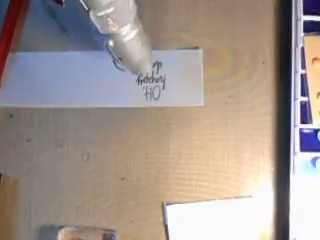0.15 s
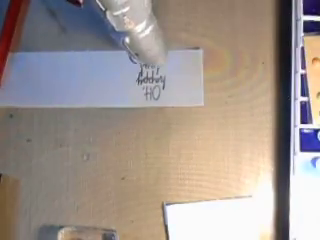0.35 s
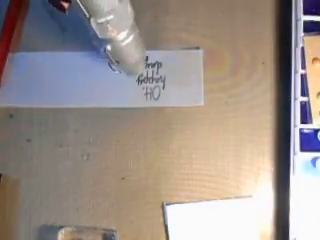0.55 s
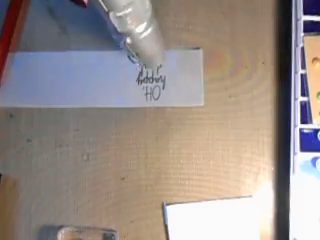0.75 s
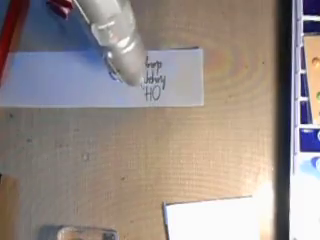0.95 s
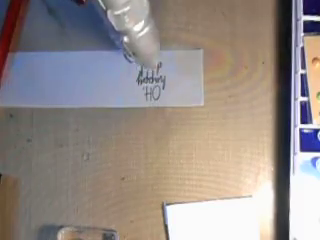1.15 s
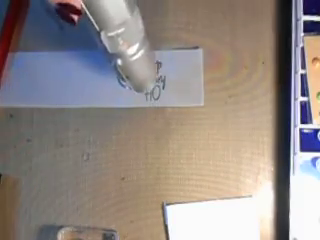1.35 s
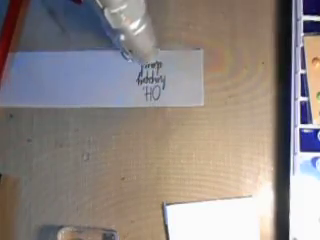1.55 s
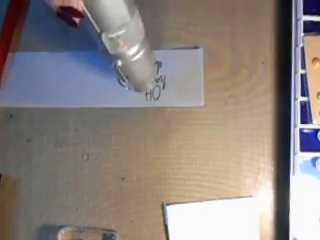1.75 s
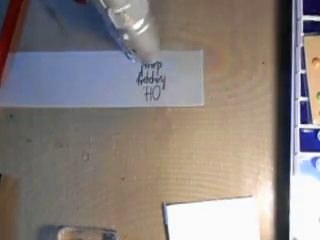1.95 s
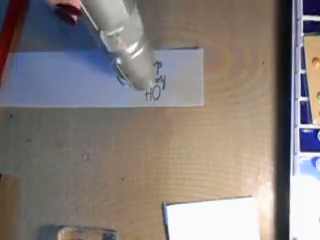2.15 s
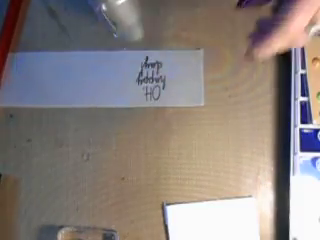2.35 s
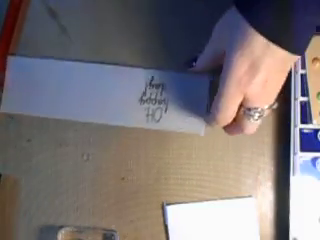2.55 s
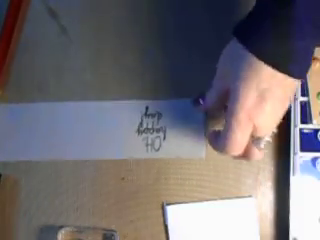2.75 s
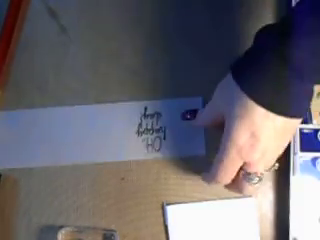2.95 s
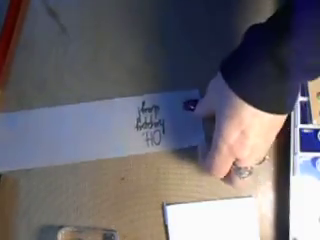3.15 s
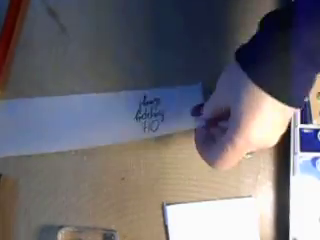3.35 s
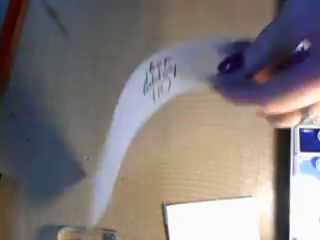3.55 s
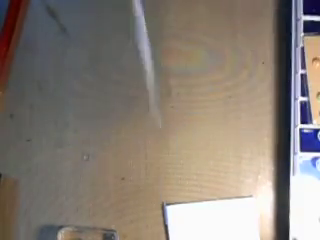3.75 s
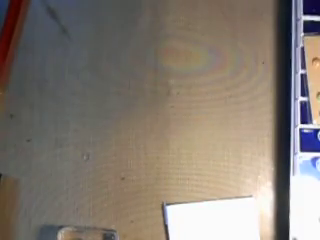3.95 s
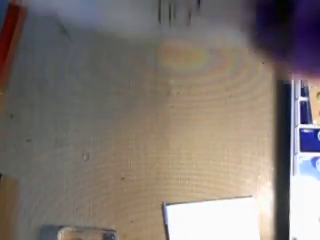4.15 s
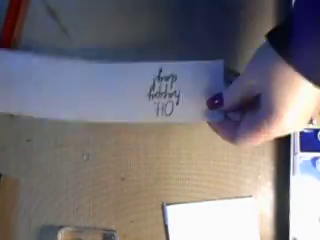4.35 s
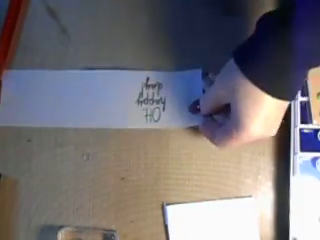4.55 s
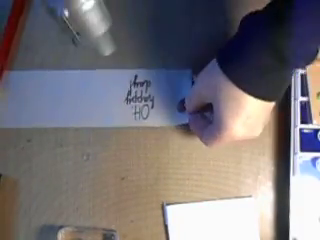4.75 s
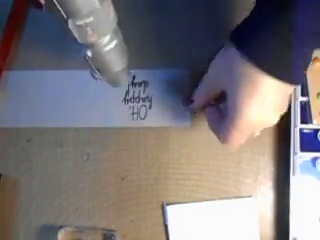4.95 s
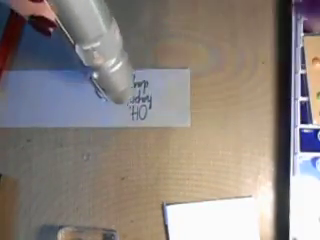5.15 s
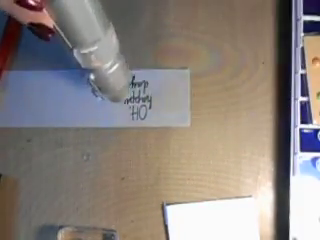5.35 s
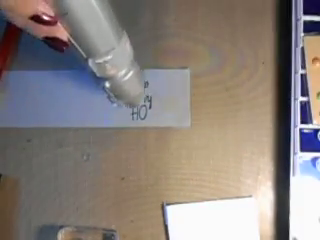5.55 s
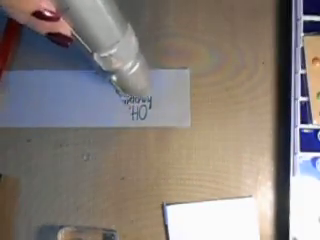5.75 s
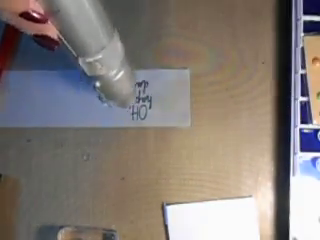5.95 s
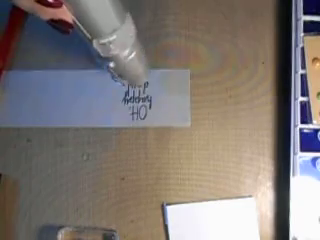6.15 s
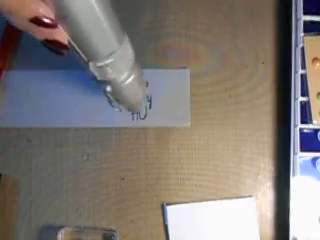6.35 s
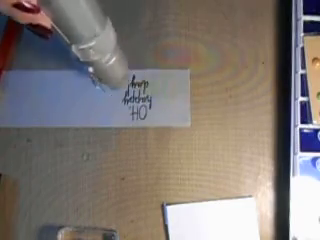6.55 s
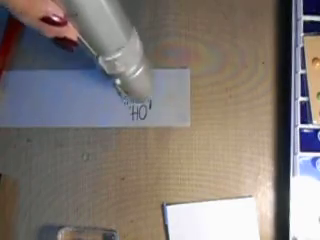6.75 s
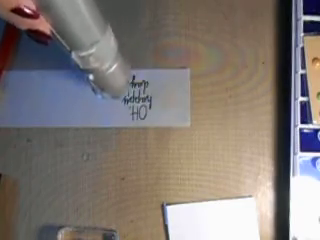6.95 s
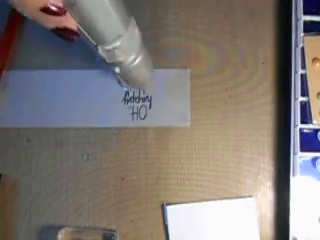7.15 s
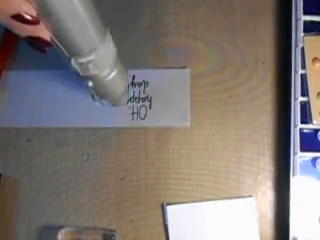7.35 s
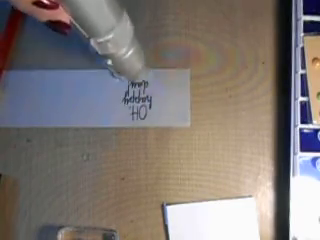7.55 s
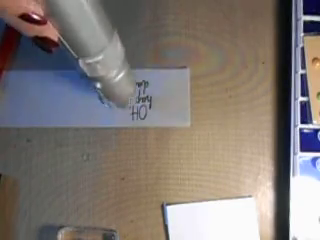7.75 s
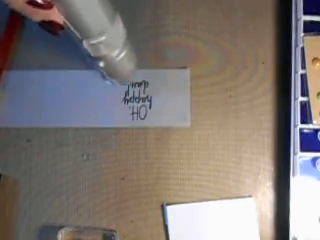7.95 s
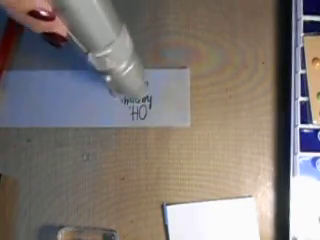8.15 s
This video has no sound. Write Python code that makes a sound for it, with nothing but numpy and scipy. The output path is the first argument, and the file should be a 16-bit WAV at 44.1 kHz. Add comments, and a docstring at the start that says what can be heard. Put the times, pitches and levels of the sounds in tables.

```python
"""A handheld heat tool is waved over a paper strip on a craft table: its fan whines as a series of shaft orders
and shaped noise hisses from the nozzle. The tool is then held aside while the strip rubs, snaps, squeaks off
the table and flaps past the microphone, whose input clips on the puff of air. The strip skids back over the
wood with a few small taps, and the waving resumes. A limiter ducks the whine after each loud moment."""
import sys
import numpy as np
from scipy import signal
from scipy.fft import rfft, irfft, next_fast_len
from scipy.io import wavfile
from scipy.ndimage import minimum_filter1d

SR = 44100
rng = np.random.default_rng(int(sys.argv[2]) if len(sys.argv) > 2 else 0)


def wrap_up_sound(samples):
    """Save the sound to the file named by the first command line argument, as 16-bit audio."""
    columns = np.atleast_2d(samples).T
    # keep every value between -1 and 1, then stretch to whole-number steps
    tamed = np.clip(columns, -1, 1)
    steps = np.round(tamed * 32767).astype(np.int16)
    wavfile.write(sys.argv[1], SR, steps)


N = 362061
TIME = np.arange(N) / SR  # s


# How the tool is held: time_s, grip (0 first, 1 held aside, 2 second; fractions blend neighbours)
GRIP_PATH = [(0, 0), (2.3, 0), (2.7, 1.07), (4.3, 1.21), (4.62, 1.8), (5.3, 2), (8.21, 2.02)]
# Nearness of the tool to the microphone: time_s, gain_db
NEARNESS = [(0, .2), (2.2, 0), (2.55, -1), (3, .5), (4.6, .8), (5.05, -1), (5.6, -0.9), (8.21, -0.4)]


def heat_tool():
    """Directivity and distance: the grip and waving hand shape whine and air, and nearness scales both."""
    grip_numbers = np.arange(3)[:, None]
    grip_shares = np.maximum(0, 1 - np.abs(curve(GRIP_PATH) - grip_numbers))
    sway = waving()
    source = whine(grip_shares, sway) + air(sway)
    return amp(curve(NEARNESS)) * source


# Fan speed: time_s, turns_hz
FAN_SPEED = [(0.0, 228.2), (0.73, 229.4), (0.8, 228.2), (1.39, 228.6), (1.55, 227.6), (1.76, 228.7),
             (2.17, 228.6), (2.4, 227.6), (2.58, 228.6), (4.37, 229.9), (4.66, 228.0), (4.92, 229.5),
             (6.54, 229.1), (6.61, 229.5), (8.14, 228.9), (8.21, 228.4)]
# The tool turns out of its beams when swung aside and back: centre_s, half_length_s, turn (units of sway)
BEAM_TURNS = [(2.63, .05, -1.8), (3.85, .4, -.8), (4.6, .2, -1.2), (5.02, .17, -.9)]


def whine(grip_shares, sway, side_db=-47, side_follow=0.5, flutter_db=1.4, beam_bend=.25,
          rattle_hz=4900, rattle_width_hz=500, rattle_db=5):
    """Harmonic series: fan shaft orders, with side tones as rectified mains shakes the motor at 120 Hz."""
    mains_phase = 2 * np.pi * 120 * TIME
    shaft_phase = 2 * np.pi * np.cumsum(curve(FAN_SPEED)) / SR
    shaft_phase += .006 * wobble(45)  # slight unsteadiness, in radians
    angle = sway.copy()
    for centre_s, half_length_s, turn in BEAM_TURNS:
        angle += turn * np.exp(-((TIME - centre_s) / half_length_s) ** 2)
    # a tone fades faster off its beam than it grows towards the middle of it
    beam = angle - beam_bend * angle ** 2
    tones = np.zeros(N)
    for order, *grip_db, first_swing_db, second_swing_db in orders():
        swing_db = first_swing_db * grip_shares[0] + second_swing_db * (1 - grip_shares[0])
        level_db = np.array(grip_db) @ grip_shares + swing_db * beam + flutter_db * wobble(9)
        order_phase = order * shaft_phase
        main_start, side_start = rng.uniform(0, 2 * np.pi, 2)
        tones += amp(level_db) * np.sin(order_phase + main_start)
        if order >= 9:
            # side_db is the level beside a -40 dB order; the housing passes side tones best near rattle_hz
            side_level_db = side_db + side_follow * (level_db + 40) + 2 * wobble(5)
            offset = (order * FAN_SPEED[0][1] - rattle_hz) / rattle_width_hz
            side_level_db += rattle_db * np.exp(-offset ** 2)
            side = rng.choice([-1, 1])  # above or below the order
            tones += amp(side_level_db) * np.sin(order_phase + side * mains_phase + side_start)
    return np.sqrt(2) * tones  # the levels above are rms


# Shaft orders that stand out, beamed differently in each grip. Swings are per unit of beam angle:
# order, first_grip_db, held_aside_db, second_grip_db, first_swing_db, second_swing_db
STRONG_ORDERS = [(3, -46, -42, -45, 0, 0), (4, -46, -41, -55, 0, 0), (5, -36.5, -32.5, -35, 1, 1),
                 (6, -31.5, -33, -28.5, .5, .5), (7, -29.5, -36.5, -27, 1, 1),
                 (9, -30, -26.3, -27.5, 1.5, 5.5), (10, -44, -35.5, -33, 0, 0), (11, -40, -34, -45, 3, 2),
                 (12, -41, -49, -44, 0, 0), (13, -37, -38.5, -32.5, 1, 2.5), (14, -36, -37, -37.5, 1.5, 1),
                 (17, -36, -39, -44, 0, 0), (18, -38, -29, -34, 3.5, 2.5), (19, -35, -36, -35, 0, -1),
                 (20, -32.5, -28.5, -37.5, 6, 5.5), (21, -37, -29.5, -39, 2, 3),
                 (22, -36.5, -43, -36, 3.5, 4.5), (23, -43, -42, -41, 3, 3), (24, -40, -45, -42, -5, 3),
                 (25, -38, -35, -33.5, 0.5, 0), (26, -39, -42, -31.5, 4, 5), (27, -35.5, -42, -48, 0, 0),
                 (31, -37, -43, -34.5, 1, 1.5), (34, -39, -38, -46, 0, 0), (39, -45, -37, -47, 0, 0),
                 (43, -44.5, -40, -39.5, 0.5, 0)]
# All other orders make an even buzz: frequency_hz, level_db (of each order)
BUZZ_LEVEL = [(230, -45), (460, -56), (1900, -39.5), (3600, -40), (6500, -40.5), (7500, -39.5), (8500, -42),
              (9300, -47), (10100, -49.5)]
# Buzz offset in each grip: first_grip_db, held_aside_db, second_grip_db
BUZZ_OFFSET_DB = [-0.5, -1, -2.5]


def orders(count=44, swing_spread_db=1.2, scatter_spread_db=1.1):
    """Line spectrum: one row of levels and swings per shaft order, strong or else randomly beamed buzz."""
    strong = {round(row[0]): row[1:] for row in STRONG_ORDERS}
    turn_hz = np.mean(np.transpose(FAN_SPEED)[1])
    rows = []
    for order in range(1, count + 1):
        scatter_db = scatter_spread_db * rng.standard_normal(len(BUZZ_OFFSET_DB))
        even_db = np.interp(order * turn_hz, *np.transpose(BUZZ_LEVEL))
        buzz_db = even_db + np.array(BUZZ_OFFSET_DB) + scatter_db
        swing_db = swing_spread_db * rng.normal(.5, 1, 2)
        rows.append((order, *strong.get(order, (*buzz_db, *swing_db))))
    return rows


# Bouts of waving: start_s, end_s, outward_push_s (moment of one push), strokes_hz, reach (units of sway)
WAVING_BOUTS = [(-.1, 2.37, 1.115, 2.69, 1.1), (5.18, 5.75, 5.28, 3.55, 1.0), (5.66, 8.4, 6.83, 2.81, 1.2)]


def waving(ease_s=.06):
    """Harmonic motion: the hand sways to and fro, positive when the nozzle is pushed out over the paper."""
    sway = np.zeros(N)
    for start_s, end_s, push_s, strokes_hz, reach in WAVING_BOUTS:
        started = np.tanh((TIME - start_s) / ease_s)
        ended = np.tanh((TIME - end_s) / ease_s)
        active = (started - ended) / 2
        sway += reach * active * np.cos(2 * np.pi * strokes_hz * (TIME - push_s))
    return sway


# Spectrum of the rushing air: frequency_hz, relative_level_db (per Hz)
RUSH_SPECTRUM = [(20, -16.5), (80, -18), (170, -3), (300, -4.5), (500, -2.5), (1000, -0.5), (2000, 2.5),
                 (3300, -8.5), (4300, -2.5), (5600, -8), (7200, -5), (8300, -7), (10200, -11),
                 (12200, -14.5)]
# Resonances and notches of the barrel: centre_hz, width_hz, gain_db
BARREL_BELLS = [(385.4, 24.7, -11), (639, 77, 9), (764, 26, -5), (883, 37, 2.5), (1190, 75, -7.5),
                (2190, 87, -8.5), (2635, 240, 4.5), (2830, 46, -9)]
# Spectrum of the jet striking the paper: frequency_hz, relative_level_db (per Hz)
JET_SPECTRUM = [(300, -45), (740, -39), (850, -5.5), (1000, -18.5), (1220, -28), (1380, -2), (1540, 1),
                (1750, -10), (1950, -4.5), (2200, -17.5), (5000, -14.5), (9000, -35), (12000, -50)]
# Spectrum of the jet whistling over the strip's edge: frequency_hz, relative_level_db (per Hz)
EDGE_SPECTRUM = [(2000, -30), (3700, -33), (4150, 2), (4550, -16), (5100, 6), (5600, -11), (8000, -20),
                 (12000, -33)]
# Where the nozzle points: time_s, share of the jet that strikes the paper (0-1)
JET_AIM = [(0, 1), (2.3, 0.88), (2.7, 0.38), (3.4, 0.2), (4.6, .15), (4.85, 0.73), (5.3, 1), (8.21, 0.99)]


def air(sway, rush_db=-23.5, jet_db=-27, edge_db=-35,
        rush_sway_db=-0.02, jet_sway_db=0.4, edge_sway_db=3, gust_db=0.7):
    """Turbulence noise: air rushes through the barrel, roars on the paper and hisses over its edge."""
    rush_level_db = rush_db + rush_sway_db * sway + gust_db * wobble(9)
    rush = amp(rush_level_db) * noise(RUSH_SPECTRUM, BARREL_BELLS)
    eddies = amp(.8 * wobble(14))
    jet = amp(jet_db + jet_sway_db * sway) * eddies * noise(JET_SPECTRUM)
    edge = amp(edge_db + edge_sway_db * sway) * noise(EDGE_SPECTRUM)
    return rush + curve(JET_AIM) * (jet + edge)


# Paper rubbing on the table and flexing: start_s, end_s, level_db, attack_s, release_s
PAPER_RUBS = [(3.05, 3.33, -35.5, .9, .1), (3.335, 3.36, -27, .06, .06), (3.58, 3.72, -29, 0.65, .5),
              (3.885, 3.96, -18, .05, .03), (4.015, 4.03, -20, .02, .045)]
# Spectrum of rubbing paper: frequency_hz, relative_level_db (per Hz)
PAPER_SPECTRUM = [(100, -18), (350, -7), (550, 6.5), (1200, -0.5), (2500, -5.5), (3300, -4.5), (3800, 2),
                  (4300, -4.5), (6000, -8), (8000, -39), (12200, -17)]
# The strip skidding flat over the wood: start_s, end_s, level_db, attack_s, release_s
WOOD_SKIDS = [(4.5, 4.68, -26, .2, 0.16), (4.72, 4.775, -21.5, 0.09, .03)]
# Spectrum of paper on wood: frequency_hz, relative_level_db (per Hz)
WOOD_SPECTRUM = [(150, -25), (400, -10), (700, 3), (1100, -8), (2000, -17), (2350, 7), (2650, 1.5),
                 (3000, -13), (5000, -1), (7200, -13), (9200, -5.5), (12000, -20)]
# Paper snaps and finger taps: start_s, peak_db, centre_hz, half_width_octaves (to half gain), t60_s
PAPER_SNAPS = [(3.356, 7, 4320, 0.96, 0.028), (4.066, -5, 1785, 0.8, 0.037),
               (4.7848, -0.5, 6480, 0.63, 0.0041), (4.875, -5.5, 4170, 0.4, 0.016),
               (4.913, -11.5, 9500, 0.45, 0.011)]


def paper(grain_db=2):
    """Friction noise and impulsive radiation: the strip rubs, skids, and snaps when it buckles or is tapped."""
    rubbing = swells(PAPER_RUBS) * amp(grain_db * wobble(160)) * noise(PAPER_SPECTRUM)
    skidding = swells(WOOD_SKIDS) * amp(wobble(60)) * noise(WOOD_SPECTRUM)
    out = rubbing + skidding
    for start_s, peak_db, centre_hz, half_width_octaves, t60_s in PAPER_SNAPS:
        age = TIME - start_s
        decay = (age >= 0) * amp(-60 * np.clip(age / t60_s, 0, 10))
        burst = decay * rng.standard_normal(N)

        def band(hz):
            """Resonance: a single peak, symmetrical in octaves."""
            octaves_off = np.log2((hz + 1) / centre_hz)
            return 1 / (1 + (octaves_off / half_width_octaves) ** 2)

        snap = filtered(burst, band)
        out += amp(peak_db) * snap / np.abs(snap).max()
    return out


def squeak(start_s=3.882, end_s=3.903, pitch_hz=3780, level_db=-24, attack_s=.008, release_s=.05, waver=.008):
    """Stick-slip: a short unsteady tone as the strip's edge catches on the wood and is whisked away."""
    unsteady_hz = pitch_hz * (1 + waver * wobble(300))
    phase = 2 * np.pi * np.cumsum(unsteady_hz) / SR
    return swells([(start_s, end_s, level_db, attack_s, release_s)]) * np.sin(phase)


# Air pushed onto the microphone by the strip: start_s, end_s, level_db, attack_s, release_s
STRIP_GUSTS = [(3.875, 3.96, -17.5, .03, .1), (3.975, 4.008, -12, .04, .045), (4.59, 4.65, -42, .07, .06)]
# Spectrum of the buffeting: frequency_hz, relative_level_db (per Hz)
BUFFET_SPECTRUM = [(15, 3.5), (50, 0.5), (130, -4.5), (220, -11), (400, -19), (1500, -64), (5000, -100)]
# Spectrum of the turbulence in the puff: frequency_hz, relative_level_db (per Hz)
PUFF_SPECTRUM = [(30, -10), (120, 0), (300, -3), (600, -9), (1200, -16.5), (3000, -28.5), (10000, -48)]


def draught(puff_s=4.002, puff_db=12, puff_half_s=0.009, flap_hz=165, quicken_hz=240, turbulence=.9):
    """Pseudo-sound: air buffets the microphone, then a hard flap swings the pressure, quickest at its height."""
    buffeting = swells(STRIP_GUSTS) * noise(BUFFET_SPECTRUM)
    puff = 1 / (1 + np.abs((TIME - puff_s) / puff_half_s) ** 3.5)
    phase = 2 * np.pi * np.cumsum(flap_hz + quicken_hz * puff ** 6) / SR
    flap = np.sin(phase + rng.uniform(0, 2 * np.pi))
    return buffeting + amp(puff_db) * puff * (flap + turbulence * noise(PUFF_SPECTRUM))


def swells(rows):
    """Exponential envelope: events rise, hold and fall; attack and release are times for a tenfold change."""
    power = np.zeros(N)
    for start_s, end_s, level_db, attack_s, release_s in rows:
        before = (start_s - TIME) / attack_s
        after = (TIME - end_s) / release_s
        outside = np.maximum(0, np.maximum(before, after))
        power += amp(level_db - 20 * outside) ** 2
    return np.sqrt(power)


def noise(spectrum, bells=()):
    """Spectral shaping: white noise filtered to (Hz, dB) points plus bell-shaped resonances, at rms 1."""
    points_hz, points_db = np.transpose(spectrum)

    def gain(hz):
        """Frequency response: straight lines in dB over log frequency, with the bells added."""
        shape_db = np.interp(np.log(hz + 1), np.log(points_hz), points_db)
        for centre_hz, width_hz, bell_db in bells:
            shape_db = shape_db + bell_db * np.exp(-((hz - centre_hz) / width_hz) ** 2)
        return amp(shape_db)

    return unit(filtered(rng.standard_normal(N), gain))


def filtered(x, gain):
    """Linear filtering: multiplies the spectrum of x by a gain that depends on frequency."""
    size = next_fast_len(N + 8192)  # padding against wrap-around
    hz = np.fft.rfftfreq(size, 1 / SR)
    return irfft(rfft(x, size) * gain(hz), size)[:N]


def wobble(rate_hz):
    """Band-limited fluctuation: a smooth random curve with rate_hz knots a second."""
    knots = rng.standard_normal(int(N * rate_hz / SR) + 4)
    fine = signal.resample_poly(knots, 8, 1)
    return np.interp(TIME * rate_hz * 8, np.arange(len(fine)), fine)


def curve(rows):
    """Linear interpolation: (s, value) rows joined by straight lines."""
    return np.interp(TIME, *np.transpose(rows))


def unit(x):
    """Normalisation: x at rms 1."""
    return x / np.sqrt(np.mean(x ** 2) + 1e-20)


def amp(db):
    """Logarithmic level: decibels to amplitude gain."""
    return 10 ** (np.asarray(db) / 20)


def scene():
    """Superposition: all the sources add at one close microphone."""
    return (heat_tool() + paper() + squeak() + draught())[None]


def limiter(x, ceiling=0.67, hold_s=0.18, release_s=0.22):
    """Gain control: looks a few milliseconds ahead, drops at a peak, holds, and lets the gain creep back."""
    size = SR // 1000  # samples in a block of about 1 ms
    peaks = np.abs(np.pad(x, (0, -N % size))).reshape(-1, size).max(axis=1)
    block_need_db = np.minimum(0, 20 * np.log10(ceiling / (peaks + 1e-9)))
    needed_db = minimum_filter1d(block_need_db, size=13)  # centred, so it sees six blocks ahead
    gain_db, wait_s, track_db = 0, 0, []
    for need_db in needed_db:
        wait_s -= size / SR
        if wait_s < 0:
            gain_db *= np.exp(-size / SR / release_s)
        if need_db < gain_db:
            gain_db, wait_s = need_db, hold_s
        track_db.append(gain_db)
    return x * amp(np.interp(np.arange(N) / size, np.arange(len(track_db)), track_db))


# Frequency response of the microphone: frequency_hz, gain_db
MICROPHONE_RESPONSE = [(20, 0), (10100, -0.5), (11000, -7.5), (12200, -19)]


def record(dry, overload_db=9.0, top_hz=12330):
    """Transduction and overload: the microphone dulls the top, the input clips, a limiter ducks, the band ends."""
    heard = filtered(dry[0], lambda hz: amp(np.interp(hz, *np.transpose(MICROPHONE_RESPONSE))))
    clipped = np.clip(heard, -amp(overload_db), amp(overload_db))
    return filtered(limiter(clipped), lambda hz: hz < top_hz)[None]


dry = scene()
out = record(dry)
wrap_up_sound(out)
```